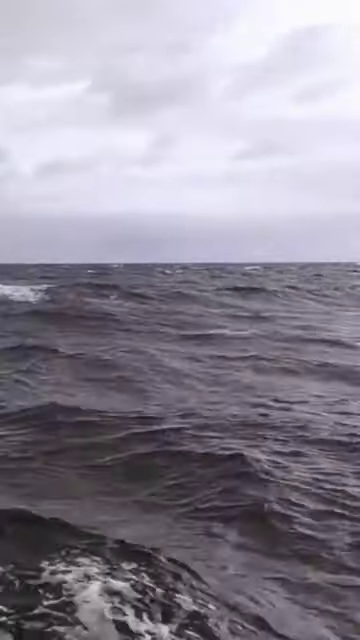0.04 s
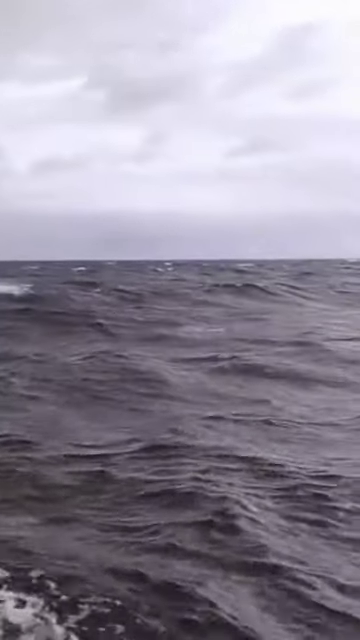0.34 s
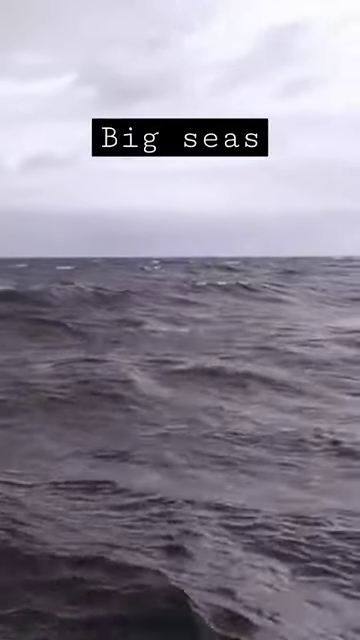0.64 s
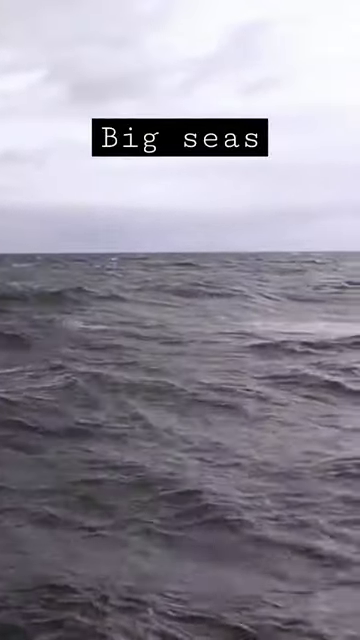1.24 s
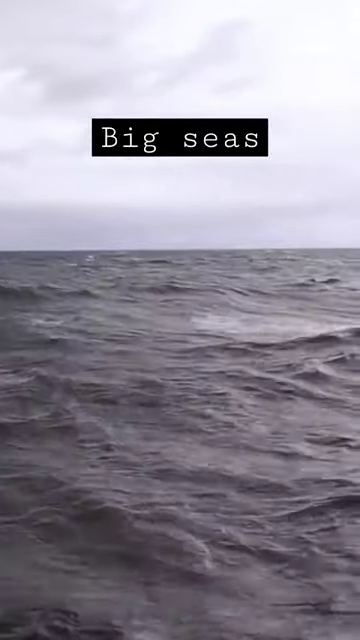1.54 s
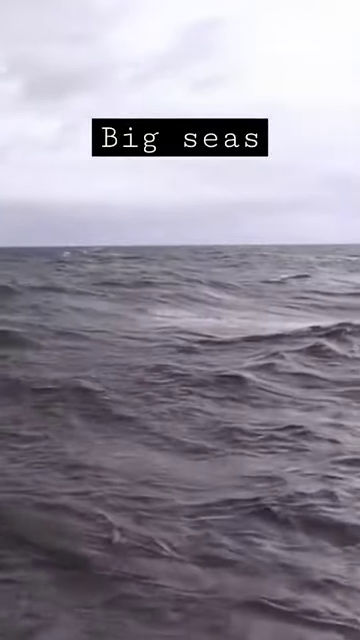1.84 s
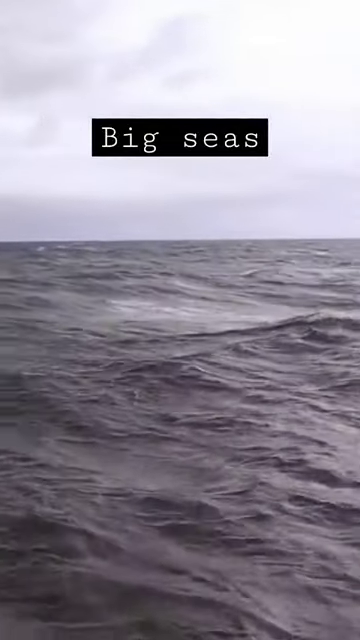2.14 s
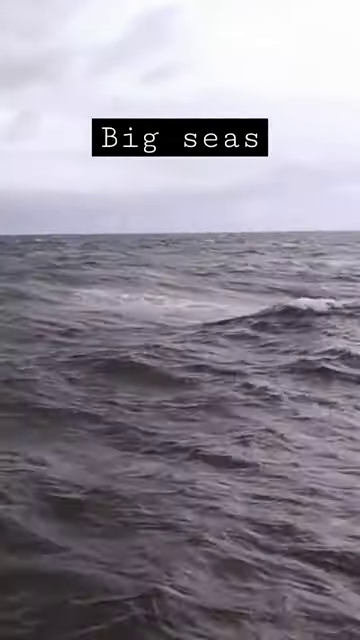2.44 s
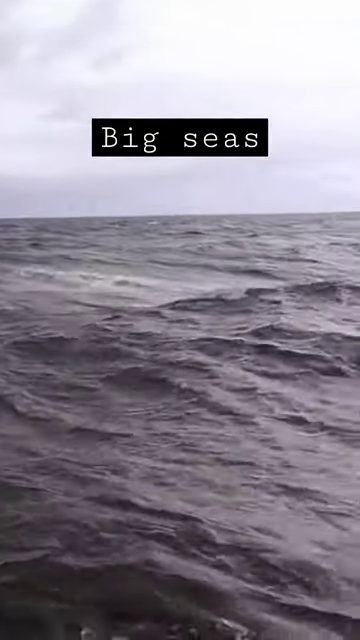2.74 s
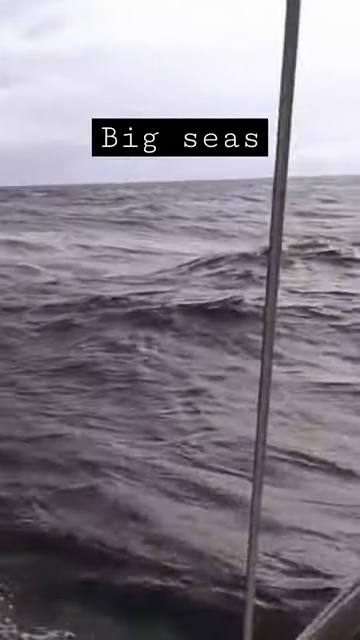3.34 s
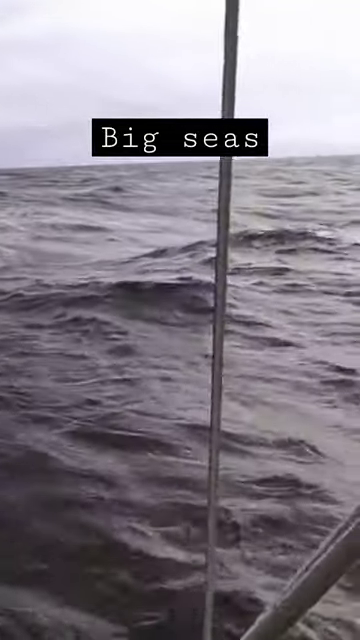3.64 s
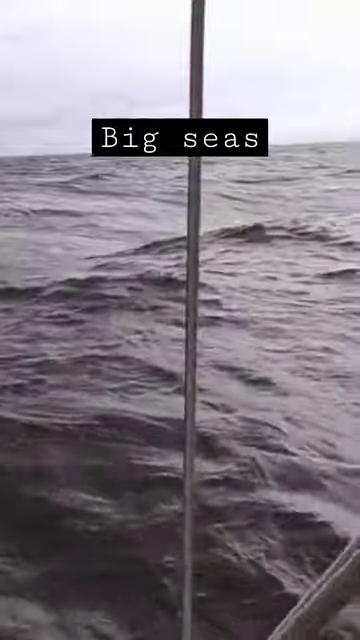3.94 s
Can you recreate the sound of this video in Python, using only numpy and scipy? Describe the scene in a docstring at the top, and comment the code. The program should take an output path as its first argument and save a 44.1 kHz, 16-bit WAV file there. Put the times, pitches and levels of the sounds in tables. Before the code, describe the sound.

Gusty wind buffets the microphone while waves wash and hiss along a boat's hull.

```python
"""A low rumble of strong wind buffets a microphone on a boat in rough open sea.
Turbulent pressure on the diaphragm rumbles, flutters and now and then pops or thumps, between lulls.
Waves break along the hull: a rushing wash with ringing bubbles, the hiss of spray and foam,
and the splashes of single crests as they collapse."""
import sys
import numpy as np
from scipy import signal
from scipy.fft import rfft, irfft
from scipy.io import wavfile
from scipy.ndimage import uniform_filter1d

SR = 44100
rng = np.random.default_rng(int(sys.argv[2]) if len(sys.argv) > 2 else 0)


def transcribe(u):
    """Save the signal u as a 16-bit wav file named by the first command-line argument.

    u: samples, shape (n,) or (channels, n), limited to [-1, 1]; the rate is SR.
    q: integer samples, one column per channel.
    """
    v = np.clip(np.atleast_2d(u).T, -1, 1)
    q = np.round(v * 32767).astype(np.int16)
    wavfile.write(sys.argv[1], SR, q)


N = 176400


def amp(db):
    """Decibels to amplitude ratio."""
    return 10 ** (np.asarray(db) / 20)


def unit(x):
    """Normalisation to rms 1."""
    return x / np.sqrt(np.mean(x ** 2) + 1e-20)


def envelope(points):
    """Gain per sample, interpolated from (time [s], level [dB]) points."""
    return amp(np.interp(np.arange(N) / SR, *np.transpose(points)))


def colour(x, spectrum):
    """Spectral shaping, falling 12 dB per octave above the last point; rms 1."""
    hz = np.fft.rfftfreq(N, 1 / SR)
    point_hz, point_db = np.transpose(spectrum)
    gain = amp(np.interp(np.log(hz + 1), np.log(point_hz + 1), point_db))
    rolloff = np.maximum(hz / point_hz[-1], 1) ** 2
    return unit(irfft(rfft(x) * gain / rolloff, N))


def wander(rate_hz):
    """Low-pass noise: a random drift from 2 Hz to about the given rate; rms 1."""
    hz = np.fft.rfftfreq(N, 1 / SR)
    return unit(irfft(rfft(rng.standard_normal(N)) * (hz > 2) * np.exp(-(hz / rate_hz) ** 2), N))


def churn(patch_db, patch_hz, patch_s):
    """Modulated noise: its level drifts in patches of time and frequency."""
    re, im, patches = rng.standard_normal((N // 128 + 5, 257, 3)).T
    bins, frames = max(round(patch_hz * 512 / SR), 1), max(round(patch_s * SR / 128), 1)
    patches = unit(uniform_filter1d(uniform_filter1d(patches, bins, axis=0), frames, axis=1))
    return signal.istft((re + 1j * im) * amp(patch_db * patches), nperseg=512, noverlap=384)[1][:N]


def impacts(per_s, spread_db):
    """A Poisson process: independent clicks, most small and a few large."""
    sizes = amp(spread_db * np.minimum(rng.exponential(1, N), 5))
    return sizes * rng.choice([-1, 1], N) * (rng.random(N) < per_s / SR)


# wind pressure on the microphone (time [s], relative level [dB])
RUMBLE_LEVEL = [(0, -20.5), (0.1, -19.5), (0.55, -18), (1.0, -20.0), (1.25, -23), (1.38, -20), (1.6, -21.5),
                (1.9, -20), (2.2, -18.5), (2.42, -19), (2.65, -19), (2.92, -18.5), (3.35, -16.5),
                (3.48, -17.5), (3.7, -17.5), (4, -18.5)]
# spectrum of the large eddies (frequency [Hz], relative level [dB])
RUMBLE_SPECTRUM = [(8, -11.5), (22, -1), (52, 0.5), (80, -0.5), (100, -3.5), (130, -5), (180, -12.5),
                   (260, -20.5), (400, -31.5), (900, -66)]
# small fast eddies at the microphone port (time [s], relative level [dB])
FLUTTER_LEVEL = [(0, -31), (0.3, -30), (0.4, -31.5), (0.52, -26), (0.61, -29), (0.69, -41), (0.76, -27.5),
                 (0.89, -30), (0.95, -38), (1.3, -36), (1.7, -37.5), (2.0, -34.5), (2.22, -29.5),
                 (2.35, -37.5), (2.9, -34), (3.08, -39), (3.16, -30.5), (3.21, -34), (3.3, -29.5),
                 (3.4, -34), (3.47, -43), (3.55, -33), (4, -32.5)]
# spectrum of the small eddies (frequency [Hz], relative level [dB])
FLUTTER_SPECTRUM = [(50, -20.5), (115, 3.5), (160, -2), (215, 3), (290, -3), (400, -10), (600, -20),
                    (1200, -31), (3000, -72)]
# brief lulls in the wind (start [s], end [s], gain [dB])
WIND_LULLS = [(0.667, 0.69, -10), (0.772, 0.839, -10.5), (0.912, 0.946, -6.5), (1.276, 1.317, -10),
              (2.403, 2.456, -6.5), (2.629, 2.652, -7), (2.89, 2.932, -4.5), (3.461, 3.482, -4),
              (3.497, 3.521, -11)]


def wind():
    """Turbulence: large eddies rumble and small ones flutter; both sink in the lulls."""
    t, edge_s = np.arange(N) / SR, 0.01
    lull_db = sum(db * np.clip(np.minimum(t - start, end - t) / edge_s, 0, 1)
                  for start, end, db in WIND_LULLS)
    pressure = colour(rng.standard_normal(N), RUMBLE_SPECTRUM)
    pressure /= np.sqrt(uniform_filter1d(pressure ** 2, size=1800) + 0.12)  # evens out chance swells
    rumble = unit(pressure) * envelope(RUMBLE_LEVEL) * amp(0.5 + 1.02 * wander(rate_hz=5.9))
    eddies = colour(rng.standard_normal(N), FLUTTER_SPECTRUM)
    clumps_db = 2 * wander(rate_hz=34) + 1.5 * wander(rate_hz=9.6)
    flutter = unit(eddies * amp(clumps_db)) * envelope(FLUTTER_LEVEL) * amp(3)
    return (rumble + flutter) * amp(lull_db)


def overload(pressure, ceiling_db=-9):
    """Saturation: pressure peaks round off softly against the microphone's ceiling."""
    return pressure / (1 + (pressure / amp(ceiling_db)) ** 4) ** (1 / 4)


# water rushing along the hull (time [s], relative level [dB])
WASH_SWELL = [(0, -43.5), (0.3, -44), (0.62, -43.5), (0.8, -37.5), (0.98, -41.5), (1.1, -41), (1.35, -40),
              (1.5, -38.5), (1.6, -37), (1.74, -35.5), (1.83, -37.5), (1.99, -38.5), (2.06, -37.5),
              (2.22, -37.5), (2.4, -39.5), (2.65, -39), (2.9, -42), (3.38, -42.5), (3.5, -44), (4, -44)]
# spectrum of the churning water (frequency [Hz], relative level [dB])
WASH_SPECTRUM = [(100, -13.5), (280, -7.5), (470, 1.5), (650, 3), (850, -0.5), (1250, -4), (1800, -10),
                 (3000, -14.5), (5000, -35), (9000, -53)]


def wash():
    """Flow noise: churning water and its bubbles swell as each wave passes the hull."""
    water = colour(churn(patch_db=1.5, patch_hz=350, patch_s=0.094), WASH_SPECTRUM)
    return (amp(1) * water + amp(-8) * bubbles()) * envelope(WASH_SWELL)


def bubbles(per_s=770, sizes=30, low_hz=486.5, high_hz=2325):
    """Bubble resonance: each size rings as a damped oscillator whose pitch rises."""
    t, out = np.arange(SR // 10) / SR, np.zeros(N)
    for hz in np.geomspace(low_hz, high_hz, sizes):
        age = t * hz / 11  # in spans of 11 cycles
        glide = 1 + 0.051 * np.minimum(age, 4)
        ring = np.sin(2 * np.pi * hz * t * glide) * np.exp(-2 * age) * (1 - np.exp(-t * hz))
        out += signal.oaconvolve(impacts(per_s / sizes, spread_db=3.5), ring)[:N]
    return unit(out)


# spray and foam of the breaking crests (time [s], relative level [dB])
SPRAY_SWELL = [(0, -50.5), (0.27, -52.5), (0.36, -48.5), (0.68, -48.5), (0.8, -42), (0.86, -45.5),
               (1.08, -50), (1.25, -42.5), (1.42, -44), (1.52, -43), (1.69, -44.5), (1.785, -42.5),
               (1.83, -46.5), (2.0, -46.5), (2.15, -43), (2.35, -47), (2.65, -47.5), (2.85, -50),
               (3.0, -47.3), (3.1, -49.5), (3.35, -49.5), (3.68, -51), (3.88, -55)]
# spectrum of the spray (frequency [Hz], relative level [dB])
SPRAY_SPECTRUM = [(400, -12.5), (1200, -1), (2200, -3), (3500, -2.5), (4900, -7.5), (6200, -14),
                  (8500, -21), (10000, -30.5), (12000, -39.5), (15000, -60)]


def spray():
    """Shot noise: drops patter back onto the sea over the continuous hiss of foam."""
    foam = colour(churn(patch_db=0.83, patch_hz=839, patch_s=0.05), SPRAY_SPECTRUM)
    drops = colour(impacts(per_s=1800, spread_db=3.5), SPRAY_SPECTRUM)
    return (amp(2) * foam + amp(-5) * drops) * envelope(SPRAY_SWELL)


# wind pops on the diaphragm (time [s], spike level [dB], half width [ms], push or pull [+1 or -1])
DIAPHRAGM_POPS = [(0.3326, -15, 0.26, -1), (.588, -18, 0.9, 1), (0.639, -20, 0.34, -1),
                  (0.757, -9.5, 0.97, -1), (0.855, -11.5, 0.42, -1), (0.862, -16.5, 0.31, -1),
                  (.894, -19, 0.22, 1), (1.9236, -11, 0.29, -1), (2.999, -15.5, 0.36, 1),
                  (3.163, -9.5, 0.44, -1), (3.300, -14, 0.5, 1), (3.396, -13.5, 0.5, 1),
                  (3.562, -16.5, 0.22, -1), (3.572, -15, 0.19, -1), (3.607, -12.5, 0.2, -1),
                  (3.6973, -13, 0.33, -1), (3.710, -11.5, 0.17, -1)]


def pops():
    """Impulse and rebound: a short pressure spike on the diaphragm, then a slower swing back."""
    t, out = np.arange(N) / SR, np.zeros(N)
    rebound_lag, rebound_width = 3.1, 2.55  # in half widths of the spike
    for when, db, width_ms, push in DIAPHRAGM_POPS:
        age = (t - when) * 1000 / width_ms
        spike = np.exp(-age ** 2 / 2)
        rebound = 0.57 * np.exp(-((age - rebound_lag) / rebound_width) ** 2 / 2)
        out += push * amp(db) * (spike - rebound)
    return out


# single strong eddies (time [s], half length [s], frequency [Hz], peak before overload [dB])
STRONG_EDDIES = [(0.513, 0.012, 200.2, -14), (2.698, 0.012, 134, -15.5), (3.154, 0.015, 151, -13),
                 (3.387, 0.0085, 385, -25), (3.528, 0.013, 185.3, -18), (3.808, 0.0093, 190.4, -18)]


def buffets():
    """Pressure oscillation: a strong eddy shakes the air at the port for a few uneven cycles."""
    t, out = np.arange(N) / SR, np.zeros(N)
    for when, half_length, hz, db in STRONG_EDDIES:
        cycles = np.cumsum(hz * (1 + 0.071 * wander(rate_hz=53))) / SR + rng.random()
        swell = np.exp(-((t - when) / half_length) ** 2 / 2)
        out += amp(db) * swell * np.sin(2 * np.pi * cycles)
    return out


# crests collapsing near the hull (peak time [s], decay [s], centre frequency [Hz], level [dB])
CRESTS = [(.785, 0.043, 1220, -39), (1.475, 0.053, 800, -35), (1.545, 0.094, 1440, -39),
          (1.735, 0.05, 1130, -35), (2.115, .08, 1890, -38.5)]


def splashes(attack_s=0.019, half_width_octaves=0.73):
    """Superposition: a collapsing crest's many drops merge into a burst that decays exponentially."""
    t, hz, out = np.arange(N) / SR, np.fft.rfftfreq(N, 1 / SR), np.zeros(N)
    for when, decay_s, centre_hz, db in CRESTS:
        band = np.exp(-(np.log2((hz + 1) / centre_hz) / half_width_octaves) ** 2 / 2)
        drops = unit(irfft(rfft(impacts(per_s=5000, spread_db=2.5)) * band, N))
        swell = np.exp(-np.maximum((when - t) / attack_s, (t - when) / decay_s))
        out += amp(db) * drops * swell
    return out


def scene():
    """The pressures of wind and sea add at one microphone."""
    return (overload(wind() + buffets()) + pops() + wash() + splashes() + spray())[None]


def record(dry, fade_s=0.008, cutoff_hz=15375):
    """Band limiting: a low-pass filter follows a short fade at each end."""
    t = np.arange(N) / SR
    fade = np.minimum(np.minimum(t, t[::-1]) / fade_s, 1)
    lowpass = signal.firwin(511, cutoff_hz, window=("kaiser", 9), fs=SR)
    return signal.oaconvolve(dry * fade, lowpass[None], "same")


dry = scene()
out = record(dry)
transcribe(out)
```